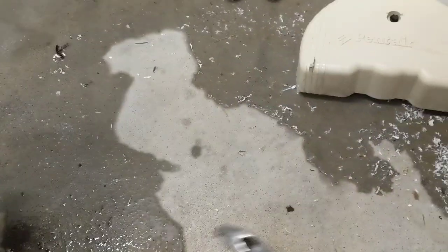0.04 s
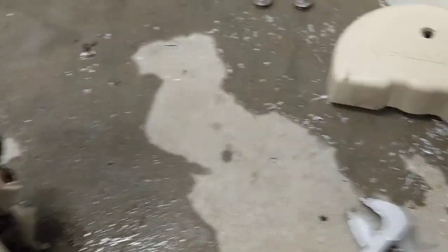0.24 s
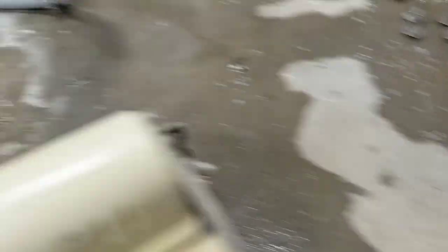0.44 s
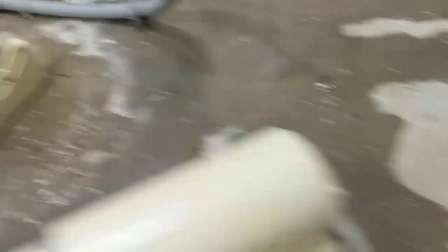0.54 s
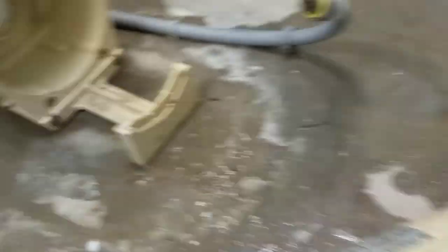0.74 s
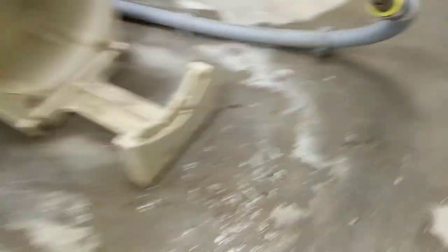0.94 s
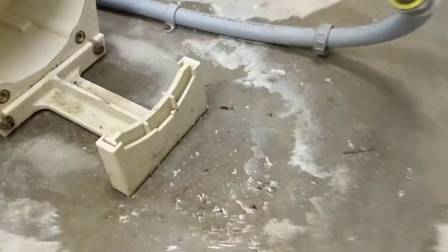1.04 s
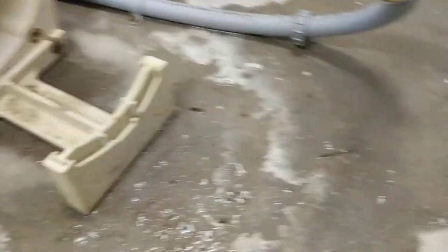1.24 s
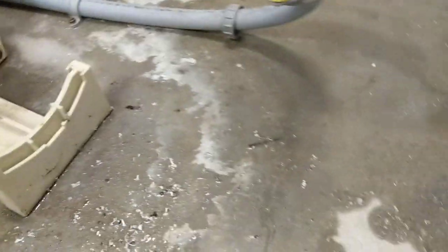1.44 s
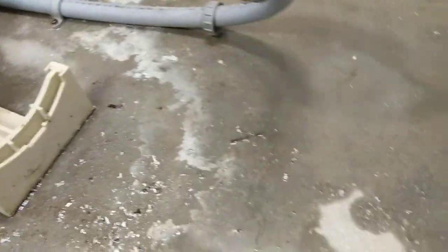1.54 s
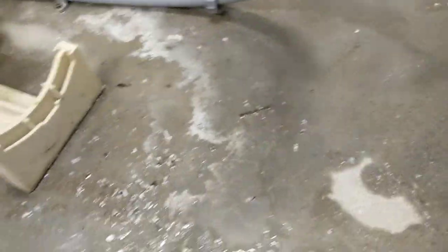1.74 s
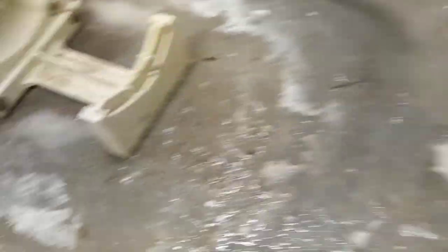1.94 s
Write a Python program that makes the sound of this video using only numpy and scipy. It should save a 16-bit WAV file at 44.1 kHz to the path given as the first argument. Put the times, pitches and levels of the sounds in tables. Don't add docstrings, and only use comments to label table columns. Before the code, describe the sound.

A steel wrench drops on concrete: sharp double-touch cracks at 0.22, 0.28 and, hardest, 0.37 seconds, the last ringing brightly into a one-second hall tail. Faint ventilation hum and a fading earlier blow lie beneath. From 1.3 to 1.55 a hollow plastic housing knocks dully on grit with dry ticks and clacks, strongest near 1.54; another knock at 1.71, a barely audible touch at 1.92.

```python
import sys
import numpy as np
from scipy import signal
from scipy.fft import rfft, irfft
from scipy.io import wavfile
from scipy.ndimage import uniform_filter1d

SR = 44100
rng = np.random.default_rng(int(sys.argv[2]) if len(sys.argv) > 2 else 0)


def pcm_store(signal):
    levels = np.round(np.clip(np.atleast_2d(signal), -1, 1) * 32767)
    wavfile.write(sys.argv[1], SR, levels.astype(np.int16).T)


def rack_gain(trim_db):
    fader = np.asarray(trim_db, float)
    return 10 ** (fader / 20)


N = 88200

# [f/Hz, level/dB per Hz]
HUM_SPECTRUM = [(40, -3.5), (190, -4), (400, -6.5), (1000, -1), (1500, -9), (2200, -12.5), (6000, -64),
                (16000, -11)]
HUM_DB = -49.5
# [f/Hz, level/dB per Hz]
EARLIER_SPECTRUM = [(50, -9.5), (160, 1), (350, -10), (1300, -3), (2000, -3.5), (5000, -19), (8000, -13.5),
                    (16000, -44.5)]
EARLIER_DB, EARLIER_T60_S = -41, .6

# [f/Hz, t60/s]
HALL_DECAY = [(100, .8), (500, .95), (2000, .9), (5000, .92), (8000, .85), (12000, .65), (16000, .45)]
HALL_RISE_S = 0.0049
WRENCH_SEND_DB, PARTS_SEND_DB, HOUSING_SEND_DB = -5, -11, -4.5

# [t/s, level/dB, lowest f/Hz, t60/s]
TICKS = [(0.1725, -44, 1610, 0.0074), (1.2947, -39, 6100, 0.0088), (1.2986, -30.5, 7000, 0.018),
         (1.3035, -38, 6000, 0.11), (1.3687, -25, 7700, 0.0023), (1.381, -29, 8500, .003),
         (1.3918, -30, 1800, 0.12), (1.422, -24, 8500, 0.0057), (1.4316, -20.5, 3600, 0.037),
         (1.4336, -22.5, 1850, 0.12), (1.4936, -26, 7000, .004), (1.5026, -18, 8500, .004),
         (1.5296, -10, 5000, .005), (1.5338, -11, 5000, .009), (1.5399, -8, 4500, .014),
         (1.5402, -17.5, 1100, 0.026), (1.7086, -22, 5500, 0.036), (1.726, -50, 6000, 0.0075),
         (1.9258, -49, 1500, 0.051), (1.9755, -47, 3970, 0.037)]
CLACK_TIMES = [
    1.4356,
    1.4518,
    1.4572,
    1.5128,
    1.5175,
]
# [level/dB, main f/Hz, t60/s]
CLACK_TONES = [
    (-18, 4170, 0.013),
    (-8, 2600, 0.039),
    (-12.5, 2000, 0.075),
    (-12, 2500, 0.019),
    (-9.5, 2830, 0.047),
]
# [ratio to main f, level/dB]
CLACK_OVERTONES = [(.8, -14), (1.83, -15.5), (2.75, -7)]
CLACK_SNAP_DB = -11.5

# [t/s, level/dB, favoured f/Hz, t60 scale]
KNOCKS = [
    (1.3087, -16, 472.5, 0.97),
    (1.3948, -14, 622, 0.46),
    (1.4152, -25, 560, 0.78),
    (1.4453, -24.5, 625, 0.68),
    (1.5051, -14, 500, 0.25),
    (1.5418, -5.5, 382, 0.21),
    (1.7078, -15, 400, .45),
    (1.7272, -29, 690, 1.3),
    (1.9242, -42, 605, .9),
]
# [f/Hz, level/dB, t60/s]
HOUSING_MODES = [(90, -30, 0.023), (150, -10, 0.07), (238, 5, 0.031), (278, -9, 0.11), (351, 7, 0.036),
                 (434, 7, 0.017), (500, 4.5, 0.061), (560, 8.5, 0.045), (653, 2, 0.11), (710.5, 1.5, 0.095),
                 (813, -2.5, 0.053), (1048, -7.5, 0.09)]
FAVOUR_DB_PER_OCT2, DETUNE = -3, .05
BOOM_DB, BOOM_T60_S = 5.5, 0.088
SQUASH_S = .003
GRIT_DB, GRIT_HZ, GRIT_T60_S = -2.5, (810, 2420), 0.11

# [t/s, crack level/dB, second touch after/s, free ring before floor damps it/s, lowest crack f/Hz]
BOUNCES = [
    (.2176, -12.5, 0.0037, 0.049, 4500),
    (.2778, -4.5, 0.0024, 0.064, 3000),
    (.3663, 3.5, .0050, .6, 3000),
]
WRENCH_MODE_HZ = [1764, 1927, 3375, 3430, 4080, 5238, 5135, 5335, 7000, 7375, 7495, 9870, 11190, 12800]
# [t60/s, level/dB at first, second, third bounce]
WRENCH_MODES = [(1, -14.5, -47, -35), (0.4, -57, -12.5, -61), (0.18, -34.5, -24, -3.5),
                (0.12, -31, -45, -7.5), (0.68, -44, -15, -18), (0.1, -26.5, -4, 1), (0.16, -39, -52, -12.5),
                (0.25, -19, -52, -6.5), (0.37, -17.5, -13.5, -9), (0.36, -35.5, -20, -13),
                (0.41, -21.5, -11, -14), (0.094, -43, -12.5, -42), (0.37, -24, -20, -7),
                (0.061, -28, -20, -42)]
THUMP_DB = [-5, -20, -10]
THUMP_HZ, THUMP_T60_S = (500, 2600), .01
SECOND_TOUCH_DB, CRACK_T60_S = -4, .045
DAMP_S = .006
CONTACT_DB, CONTACT_T60_S = 5, .05

# [f/Hz, level/dB]
MIC_COLOUR = [(30, -21), (70, 13.5), (150, 7.93), (2300, 0), (5000, 10.45), (7400, 11), (8800, 2),
              (16000, -0.5)]
GAIN_KNEE_DB, GAIN_SHARE = -40, .4
GAIN_ATTACK_S, RECOVER_DB_PER_S = .004, 45
CEILING = .31
CUTOFF_HZ = 16500


def at_hz(points, hz):
    curve_hz, value = np.array(points).T
    return np.interp(np.log(hz), np.log(curve_hz), value)


def rms_one(x):
    return x / np.sqrt(np.mean(x ** 2) + 1e-20)


def add(out, s, x):
    i = int(s * SR)
    out[i:i + len(x)] += x[:N - i]


def ring(hz, t60, length_s):
    t = np.arange(int(length_s * SR)) / SR
    return np.sin(2 * np.pi * hz * t) * rack_gain(-60 * t / t60)


def burst(low_hz, high_hz, t60):
    t = np.arange(4410) / SR
    band = signal.butter(3, [low_hz, min(high_hz, .45 * SR)], "band", fs=SR, output="sos")
    puff = rng.standard_normal(len(t))
    puff[0] = 4
    return signal.sosfilt(band, puff * rack_gain(-60 * t / t60))


def coloured(spectrum):
    hz = np.maximum(np.arange(N // 2 + 1) * SR / N, 10)
    white = rfft(rng.standard_normal(N))
    return rms_one(irfft(white * rack_gain(at_hz(spectrum, hz)), N))


def ventilation():
    return rack_gain(HUM_DB) * coloured(HUM_SPECTRUM)


def earlier_blow():
    t = np.arange(N) / SR
    return rack_gain(EARLIER_DB - 60 * t / EARLIER_T60_S) * coloured(EARLIER_SPECTRUM)


def hall(x):
    t, tail = np.arange(N) / SR, np.zeros(N)
    edges = 60 * 2 ** np.arange(0, 8.3, .5)
    white = rng.standard_normal((2, N))
    for k, (low, high) in enumerate(zip(edges, edges[1:])):
        sos = signal.butter(2, [low, high], "band", fs=SR, output="sos")
        band = signal.sosfilt(sos, white[k % 2])
        tail += band * rack_gain(-60 * t / at_hz(HALL_DECAY, np.sqrt(low * high)))
    tail *= 1 - np.exp(-t / HALL_RISE_S)
    return signal.fftconvolve(x, tail / np.sqrt(np.sum(tail ** 2)))[:N]


def small_parts():
    out = np.zeros(N)
    for s, db, low_hz, t60 in TICKS:
        add(out, s, rack_gain(db) * burst(low_hz, 24000, t60))
    for s, (db, hz, t60) in zip(CLACK_TIMES, CLACK_TONES):
        tone = ring(hz, t60, .1)
        for ratio, overtone_db in CLACK_OVERTONES:
            tone = tone + rack_gain(overtone_db) * ring(hz * ratio, t60 / ratio, .1)
        add(out, s, rack_gain(db) * tone)
        add(out, s, rack_gain(db + CLACK_SNAP_DB) * burst(1130, 12300, 0.083))
    return out


def housing():
    out = np.zeros(N)
    t = np.arange(int(.35 * SR)) / SR
    for s, db, favoured_hz, scale in KNOCKS:
        boom = -rack_gain(BOOM_DB) * ring(favoured_hz, BOOM_T60_S * scale, .4)[:len(t)]
        for hz, mode_db, t60 in HOUSING_MODES:
            vary, off, turn = rng.normal(0, 1, 3)
            favour_db = FAVOUR_DB_PER_OCT2 * np.log2(hz / favoured_hz) ** 2
            level = rack_gain(mode_db + 2 * vary + favour_db - 60 * t / (t60 * scale))
            boom = boom + level * np.sin(2 * np.pi * hz * (1 + DETUNE * off) * t + 2 * turn)
        add(out, s, rack_gain(db + GRIT_DB) * burst(*GRIT_HZ, GRIT_T60_S))
        add(out, s, rack_gain(db) * boom * (1 - np.exp(-t / SQUASH_S)))
    return out


def wrench():
    steel, thumps = np.zeros((2, N))
    t = np.arange(SR) / SR
    for k, (s, db, second_s, free_s, low_hz) in enumerate(BOUNCES):
        rings = np.zeros(SR)
        for hz, mode in zip(WRENCH_MODE_HZ, WRENCH_MODES):
            rings += rack_gain(mode[1 + k]) * ring(hz, mode[0], 1)
        free = rack_gain(-np.maximum(t - free_s, 0) / DAMP_S * 10)
        contact = rack_gain(CONTACT_DB - 60 * t / CONTACT_T60_S)
        add(steel, s, 0.48 * rings * (free + contact))
        for lag, loss_db in ((0, 0), (second_s, SECOND_TOUCH_DB)):
            add(steel, s + lag, rack_gain(db + loss_db) * burst(low_hz, 14200, CRACK_T60_S))
            thump = burst(*THUMP_HZ, THUMP_T60_S)
            add(thumps, s + lag, rack_gain(THUMP_DB[k] + 2 * loss_db) * thump)
    return steel, thumps


def scene():
    steel, thumps = wrench()
    parts, shell = small_parts(), housing()
    send = rack_gain(WRENCH_SEND_DB) * steel + rack_gain(PARTS_SEND_DB) * parts + rack_gain(HOUSING_SEND_DB) * shell
    mix = steel + thumps + parts + shell + hall(send) + earlier_blow() + ventilation()
    return mix[None]


def roll_off(x):
    return signal.sosfilt(signal.butter(12, 16800, fs=SR, output="sos"), x)


def record(dry):
    t, hz = np.arange(N) / SR, np.linspace(0, SR / 2, 1025)
    colour = rack_gain(2 * at_hz(MIC_COLOUR, np.maximum(hz, 10)))
    taps = signal.minimum_phase(signal.firwin2(2047, hz, colour, fs=SR))
    x = signal.fftconvolve(dry[0], taps)[:N]

    level = 10 * np.log10(uniform_filter1d(x ** 2, size=441) + 1e-12)
    recovery = RECOVER_DB_PER_S * t
    held = np.maximum.accumulate(level + recovery) - recovery
    cut_db = GAIN_SHARE * np.maximum(held - GAIN_KNEE_DB, 0)
    r = np.exp(-1 / (GAIN_ATTACK_S * SR))
    x = x * rack_gain(-signal.lfilter([1 - r], [1, -r], cut_db))

    rounded = CEILING * np.tanh(x / CEILING)
    treble_limit = signal.cheby2(10, 50, CUTOFF_HZ, fs=SR, output="sos")
    mix = signal.sosfilt(treble_limit, rounded)[None]
    return roll_off(mix)


dry = scene()
out = record(dry)
pcm_store(out)
```